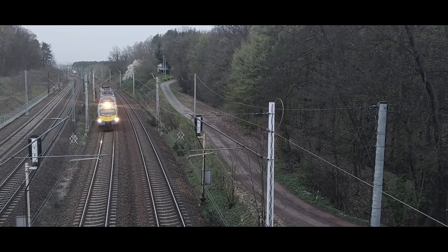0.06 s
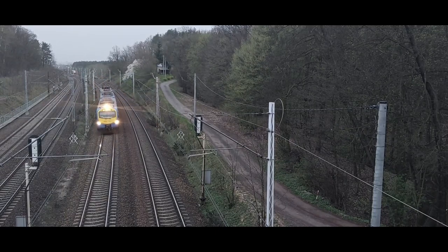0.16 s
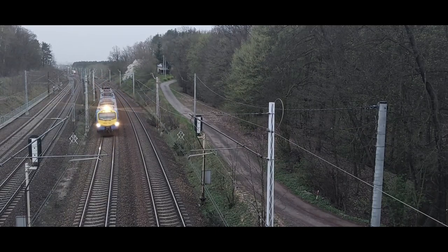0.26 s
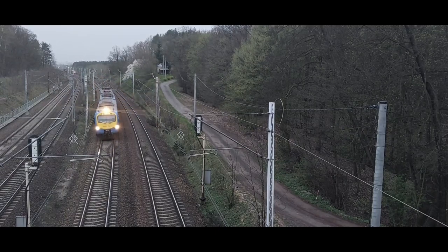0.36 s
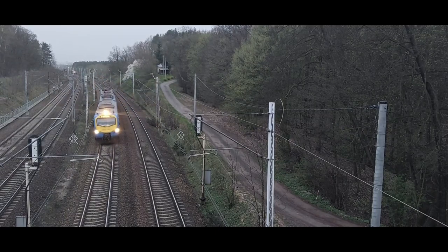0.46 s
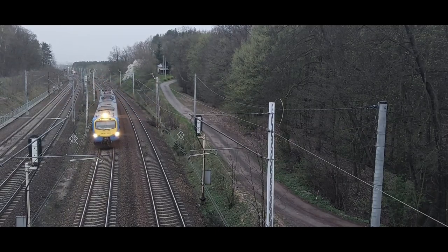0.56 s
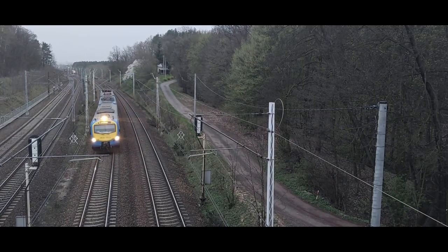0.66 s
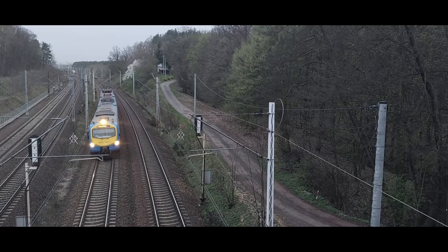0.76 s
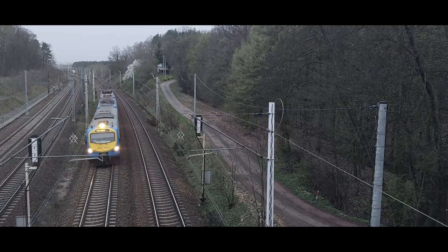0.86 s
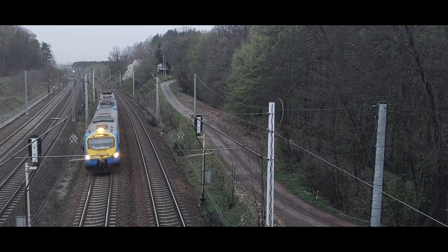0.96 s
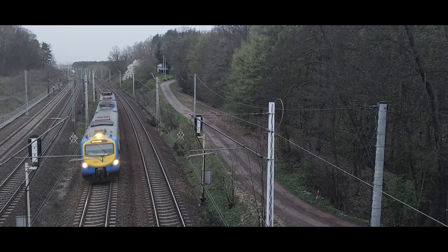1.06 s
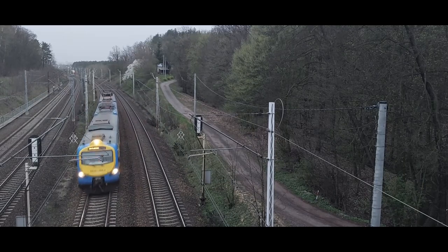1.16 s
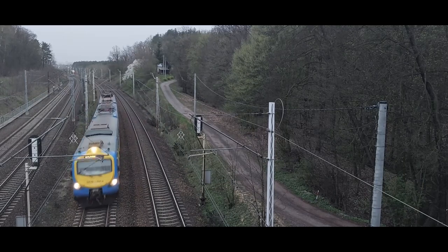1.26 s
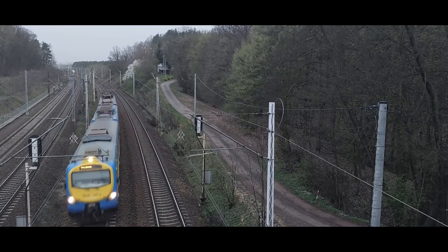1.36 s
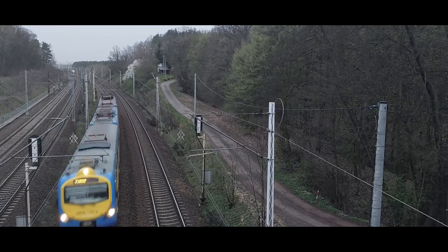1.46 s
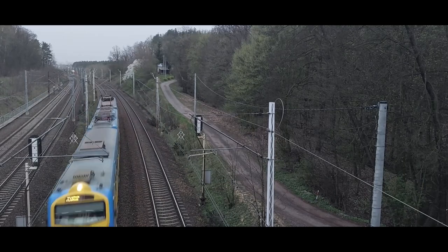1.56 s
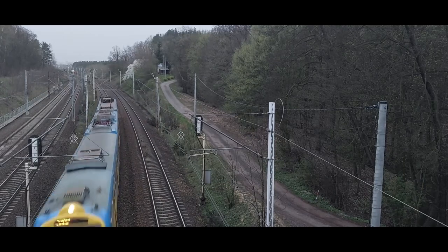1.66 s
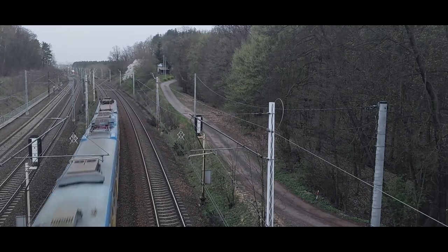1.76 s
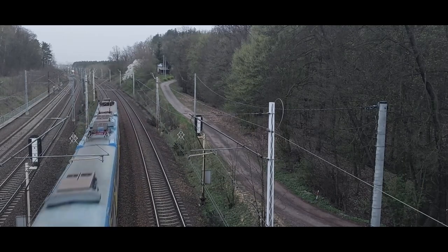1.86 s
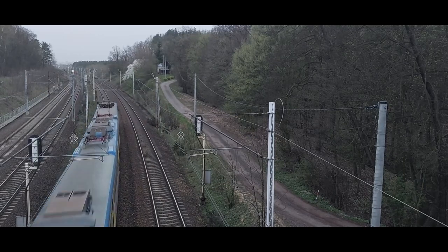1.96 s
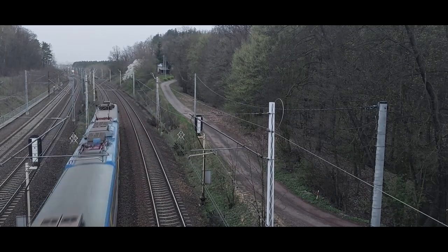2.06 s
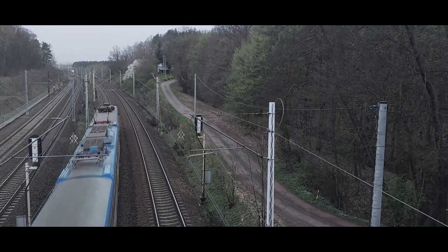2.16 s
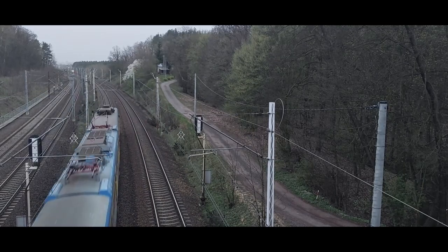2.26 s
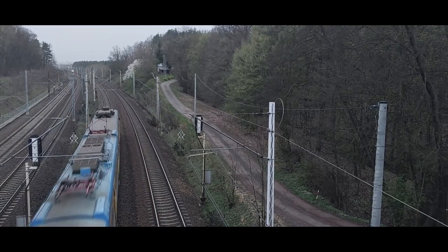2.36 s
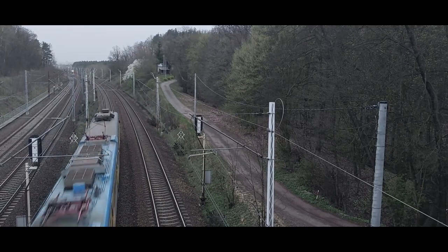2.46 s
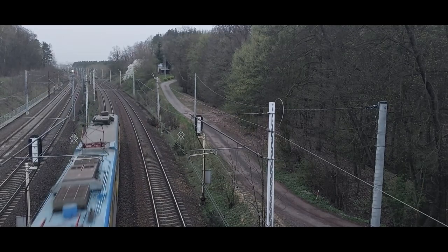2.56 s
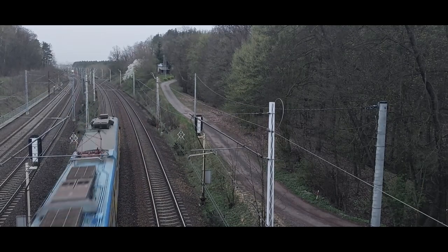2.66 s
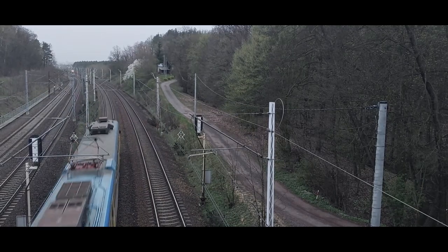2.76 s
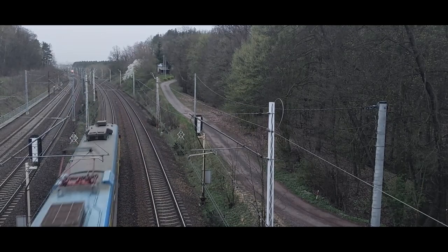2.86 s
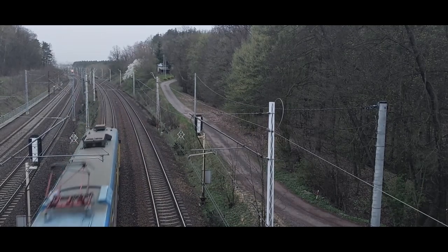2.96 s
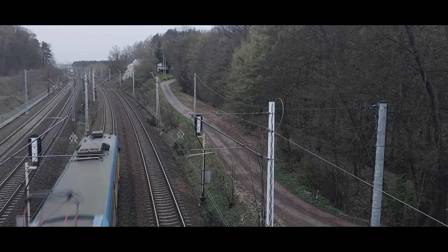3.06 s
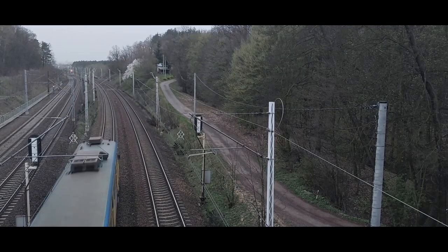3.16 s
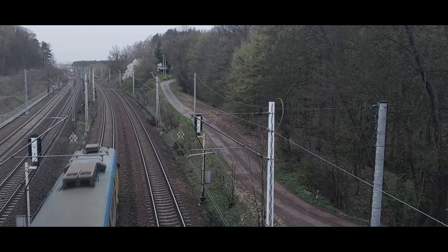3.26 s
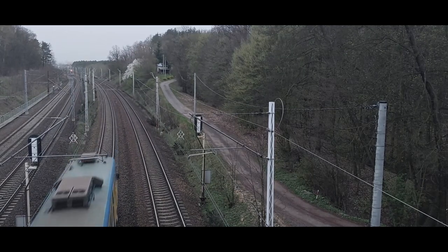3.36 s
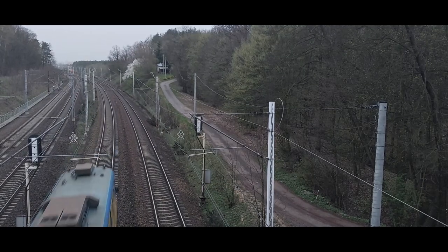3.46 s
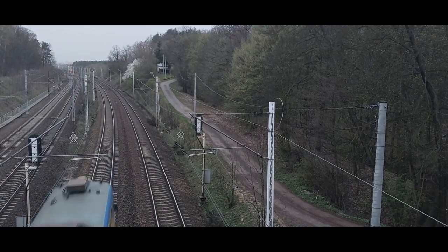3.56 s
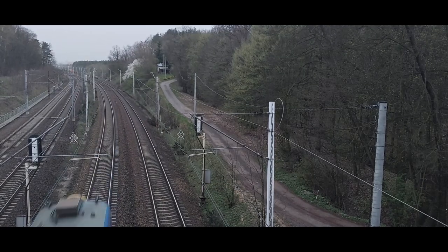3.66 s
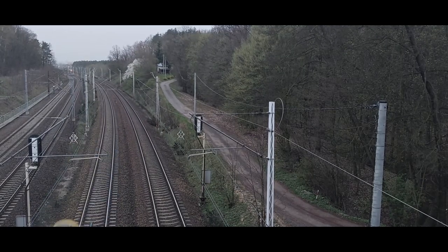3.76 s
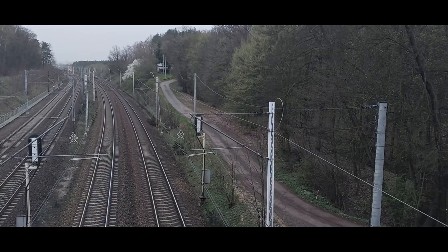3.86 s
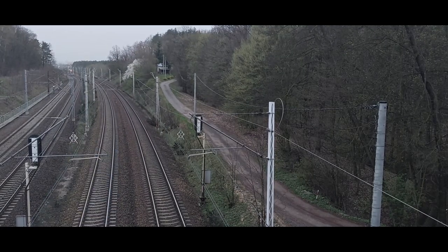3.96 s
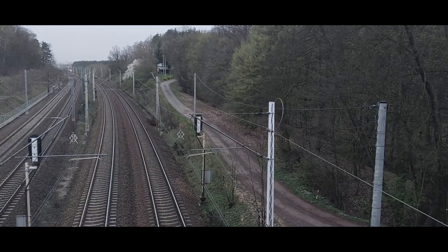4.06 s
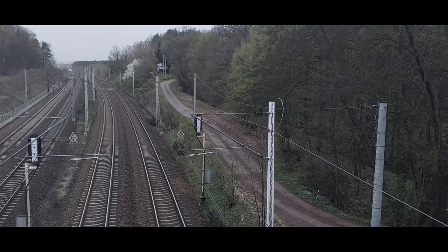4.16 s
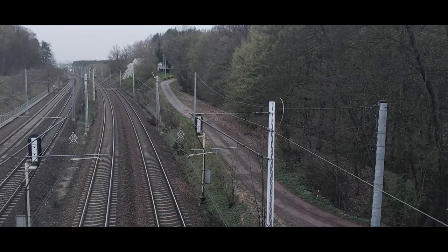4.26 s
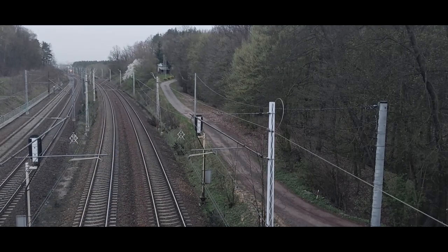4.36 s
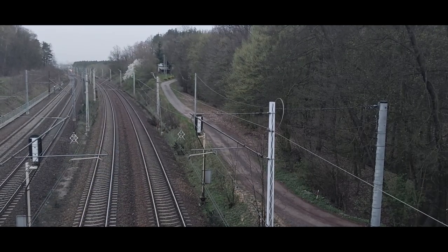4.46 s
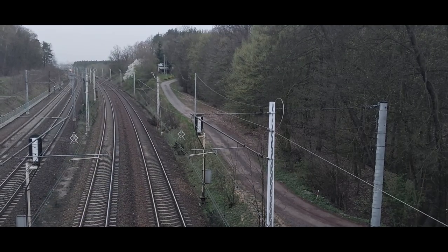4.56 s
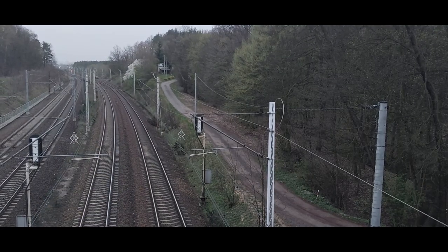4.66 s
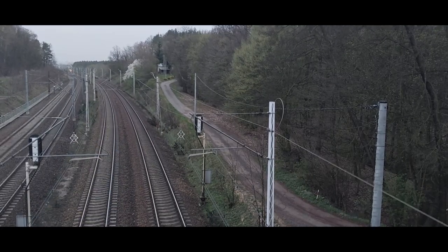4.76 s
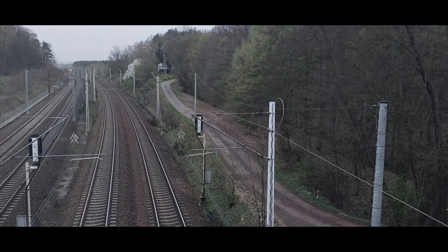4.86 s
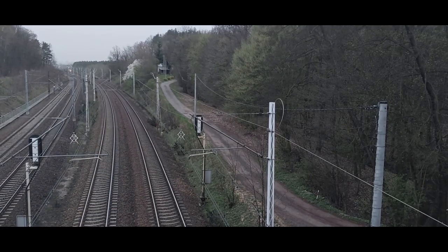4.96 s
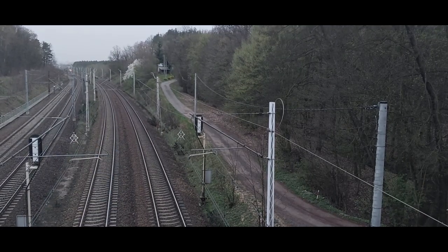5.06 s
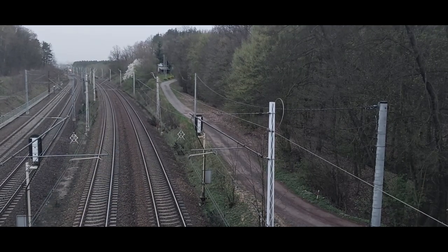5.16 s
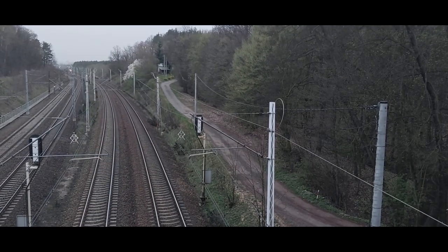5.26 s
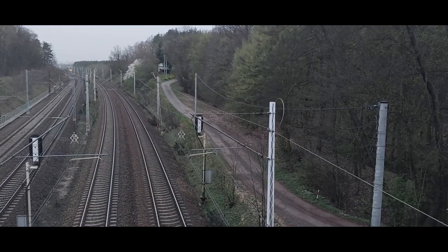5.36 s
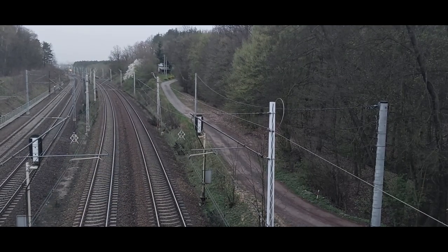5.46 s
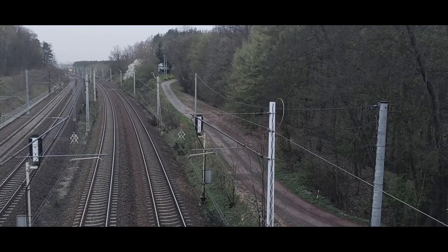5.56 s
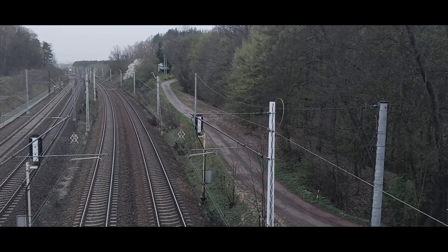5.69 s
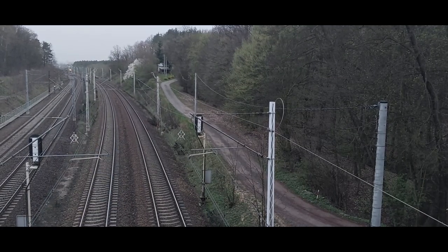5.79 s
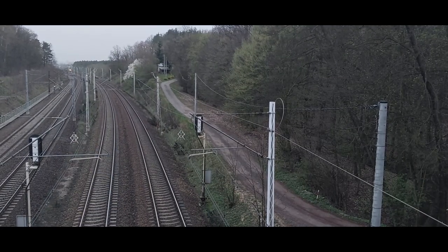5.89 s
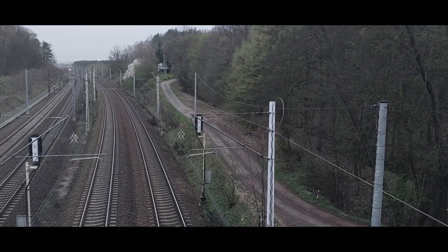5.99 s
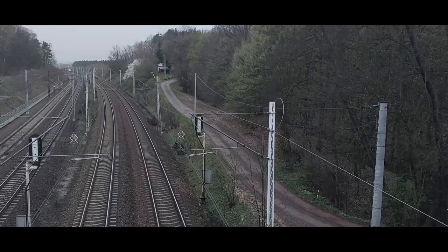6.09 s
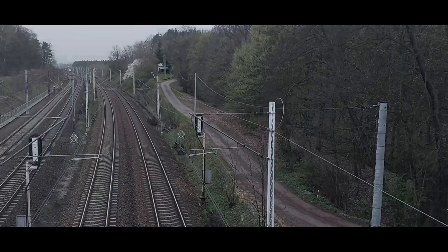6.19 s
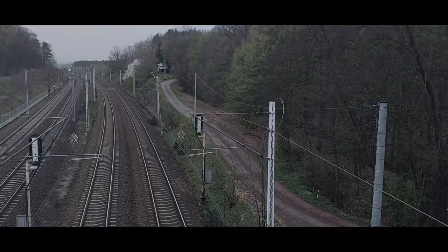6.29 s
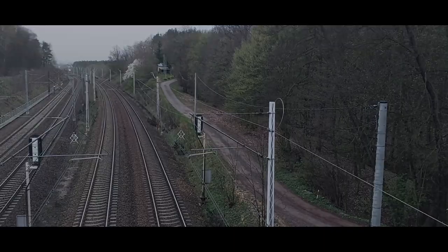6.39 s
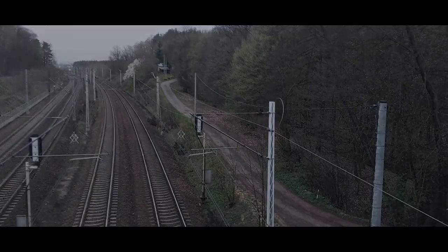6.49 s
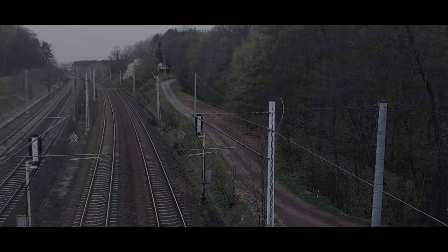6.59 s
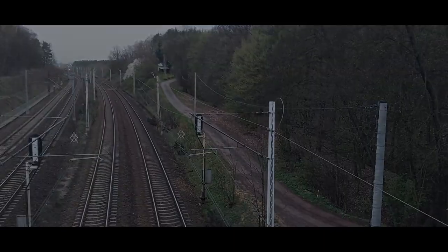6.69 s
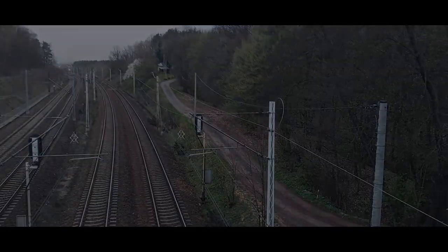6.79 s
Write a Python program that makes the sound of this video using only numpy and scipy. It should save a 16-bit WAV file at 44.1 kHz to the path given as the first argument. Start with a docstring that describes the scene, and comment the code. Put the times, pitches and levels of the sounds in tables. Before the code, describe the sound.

Three blasts of a train's air horn on one pitch, then wheel roar rushing close underneath with a brief hum, fading to ringing rails.

```python
"""An electric train, heard from a bridge over a wooded cutting, comes on with a low roar of wheels and rails.
At once its air horn blows three blasts: reed partials that fade in and out as their paths through the air
interfere, and that the slopes send back as a blurred tail. The roar, noise bands with rail resonances, swells as
the train runs in under the deck, which hums for a moment on one narrow resonance. Then the train draws away:
the roar sinks, the rails sing on as resonant noise, and faint ticks of treble noise follow."""
import sys
import numpy as np
from scipy import signal
from scipy.io import wavfile

SR = 44100
rng = np.random.default_rng(int(sys.argv[2]) if len(sys.argv) > 2 else 0)


def dump_mix(stems):
    """Bounce the given channels to the path in sys.argv[1] as a 16-bit WAV at rate SR."""
    frames = np.atleast_2d(stems).T  # one column per channel
    limited = np.clip(frames, -1, 1)  # hard clip at full scale
    pcm = np.round(limited * 32767).astype(np.int16)
    wavfile.write(sys.argv[1], SR, pcm)


N = 301185


def amp(db):
    """Gain of a level in dB."""
    return 10 ** (np.asarray(db) / 20)


def rms_one(x):
    """Scaled to rms 1."""
    return x / np.sqrt(np.mean(x ** 2) + 1e-20)


def in_time(rows):
    """Columns of a curve table, interpolated at every sample."""
    time_s, *columns = np.transpose(rows)
    return [np.interp(np.arange(N) / SR, time_s, column) for column in columns]


def at_hz(points, hz):
    """A spectrum table read on a log-frequency axis."""
    table_hz, values = np.transpose(points)
    return np.interp(np.log(hz), np.log(table_hz), values)


def drift(rate_hz, size=N):
    """Slow chance, rms 1: noise at every 40th sample through a double one-pole low-pass."""
    r = np.exp(-80 * np.pi * rate_hz / SR)
    noise = rng.standard_normal(size // 40 + 2002)
    slow = signal.lfilter([1], [1, -2 * r, r * r], noise)[2000:]  # settled part
    return np.interp(np.arange(size) / 40, np.arange(len(slow)), rms_one(slow))


def resonance(x, hz, width_hz):
    """Two-pole resonance, gain 1 on top."""
    r = np.exp(-np.pi * width_hz / SR)
    zeros = np.array([1, 0, -1]) * (1 - r * r) / 2
    poles = [1, -2 * r * np.cos(2 * np.pi * hz / SR), r * r]
    return signal.lfilter(zeros, poles, x)


def sides(db):
    """Left and right gains of a left-right difference in dB."""
    return np.array([amp(db / 2), amp(-db / 2)])


# faint high ticks: start_s, level_db (before a 4 dB trim)
TICKS = [(5.6261, -44), (5.9194, -46), (6.7261, -48)]
TICK_CUT_HZ, TICK_T60_S = 12000, .05


def ticks():
    """Each tick is a short puff of treble noise: abrupt start, exponential decay."""
    t = np.arange(N) / SR
    shape = 0
    for start_s, level_db in TICKS:
        decay_db = 60 * np.clip(t - start_s, 0, 1) / TICK_T60_S
        shape = shape + amp(level_db - 4 - decay_db) * (t >= start_s)
    high_pass = signal.butter(4, TICK_CUT_HZ, "high", fs=SR, output="sos")
    return shape * rms_one(signal.sosfilt(high_pass, rng.standard_normal((2, N))))


# singing of the rails behind the train: time_s, level_db (of the part common to both sides)
SINGING = [(2.4, -40), (3.2, -30.5), (3.8, -35), (4.4, -33.5), (5.0, -34), (5.6, -32), (6.2, -34),
           (6.83, -37)]
SINGING_HZ, SINGING_PASS_WIDTH_HZ = 810, 75


def singing_rails():
    """Noise twice through the bending resonance of the rail between sleepers; partly alike on both sides."""
    fade_in = (SINGING[0][0] - .3, -70)
    level_db, = in_time([fade_in] + list(SINGING))
    noise = rng.standard_normal((2, N))
    for _ in range(2):
        noise = resonance(noise, SINGING_HZ, SINGING_PASS_WIDTH_HZ)
    mid, side = noise
    pair = rms_one(mid) + 0.81 * rms_one(side) * [[1], [-1]]
    return amp(level_db + 1.84 * drift(4.9)) * pair


# deck hums: start_s, level_db, hold_s
HUM = [(2.988, -31, .012), (3.06, -25.5, .015), (3.106, -28, 0.025), (3.221, -19, 0.042),
       (3.48, -29, 0.021)]
HUM_HZ, HUM_PASS_WIDTH_HZ = 260, 17
HUM_RISE_DB_PER_S, HUM_FALL_DB_PER_S = 700, 400


def deck_hum():
    """A narrow resonance of the bridge deck, shaken while the bogies run under it: steady tone plus noise."""
    t = np.arange(N) / SR
    swells_db = []
    for start_s, level_db, hold_s in HUM:
        rise_db = HUM_RISE_DB_PER_S * np.clip(start_s - t, 0, 1)
        fall_db = HUM_FALL_DB_PER_S * np.clip(t - start_s - hold_s, 0, 1)
        swells_db.append(level_db - rise_db - fall_db)
    shake = rng.standard_normal(N)
    for _ in range(2):
        shake = resonance(shake, HUM_HZ, HUM_PASS_WIDTH_HZ)
    tone = np.sin(2 * np.pi * HUM_HZ * t)
    return amp(np.max(swells_db, axis=0)) * (1.2 * tone + 0.43 * rms_one(shake))


# swing of the rolling noise, each band's mean removed later: time_s, rumble_db, roar_db, hiss_db
ROLLING = [(0, -53, -46.5, -60), (.4, -49.5, -41.5, -61), (1.2, -48, -41, -58), (1.63, -40, -34.5, -54.5),
           (1.79, -41, -30, -53), (1.94, -40, -37.5, -54.5), (2.26, -44, -37.5, -55.5),
           (2.4, -43, -33, -52.5), (2.64, -33.5, -29.5, -48.5), (2.85, -33, -27, -46),
           (3.15, -30, -22, -42), (3.35, -35, -24.5, -43.5), (3.55, -35, -25, -46), (3.8, -37.5, -27, -44),
           (4.09, -39.5, -27, -47.5), (4.45, -44, -30.5, -51.5), (5.05, -44.5, -32.5, -51.5),
           (6.1, -45.5, -34, -52.5), (6.83, -47.5, -36, -55.5)]
# centres of the layers, deep rumble, rumble, roar, ring, hiss, upper hiss, top: centre_hz
LAYER_HZ = (55, 180, 550, 1300, 3500, 6000, 11000)
# relative band spectrum of the rolling noise as the microphones hear it: freq_hz, level_db
ROAR = [(15, -45), (25, -16), (49, -7.5), (193, -8), (253, -6), (313, -7), (803, 3), (1200, -8.5),
        (1450, -7), (3170, -18.5), (4370, -20.5), (7100, -37), (8570, -75), (11800, -32.5), (15500, -53)]
# rail resonances: freq_hz, width_hz, lift_db
RAIL = [(429, 30, 4), (627, 7, 4.5), (686, 14, -0.5), (1098, 42, 2), (1443, 122, 7), (2106, 340, 3),
        (7110, 420, 9)]
# correlation of the two sides: freq_hz, likeness (-1 to 1)
LIKENESS = [(60, 0.93), (99, 1), (160, 0.91), (270, 0.94), (450, 0.7), (740, 0.45), (1220, -0.34),
            (2010, 0.35), (3330, -0.066), (5500, 0.01), (9080, -0.59), (15000, 0.59)]
# balance of the two sides: freq_hz, left_minus_right_db
TILT = [(60, 1), (150, 1), (380, -1), (950, 1), (2380, 0.0), (5980, -1.5), (15000, 0.5)]
# deep rumble follows the roar, in lumps, and lingers; wheel ring and upper hiss follow the hiss
DEEP_SHARE, DEEP_LUMP_DB, DEEP_RISE_DB_PER_S = 0.82, 2, 0.3
RING_SHARE, EDGE_SHARE = 0.72, 1.21


def rolling(flutter_db):
    """Rough wheels and rails roar: third-octave noise bands, levelled by the nearest layers; then the rails ring."""
    rumble, roar, hiss = in_time(ROLLING)
    deep = DEEP_SHARE * roar + DEEP_RISE_DB_PER_S * np.arange(N) / SR + DEEP_LUMP_DB * drift(3)
    layers_db = deep, rumble, roar, RING_SHARE * hiss, hiss, EDGE_SHARE * hiss, hiss
    edges_hz = 25 * 2 ** np.arange(0, 9.5, 1 / 3)
    white = rng.standard_normal((2, 2, N))  # neighbouring bands get unrelated noise
    out = 0
    for band, (low_hz, high_hz) in enumerate(zip(edges_hz, edges_hz[1:])):
        band_pass = signal.butter(2, [low_hz, high_hz], "band", fs=SR, output="sos")
        mid, side = signal.sosfilt(band_pass, white[band % 2])
        hz = np.sqrt(low_hz * high_hz)

        place = np.interp(np.log(hz), np.log(LAYER_HZ), range(7))
        below = min(int(place), 5)
        swing_db = layers_db[below] + (place - below) * (layers_db[below + 1] - layers_db[below])
        level_db = swing_db - swing_db.mean() + at_hz(ROAR, hz) + flutter_db * drift(12)

        alike = np.clip(at_hz(LIKENESS, hz), -1, 1)
        pair = np.sqrt(1 + alike) * mid + np.sqrt(1 - alike) * side * [[1], [-1]]
        out = out + amp(level_db) * sides(at_hz(TILT, hz))[:, None] * pair
    for hz, width_hz, lift_db in RAIL:
        out = out + (amp(lift_db) - 1) * resonance(out, hz, width_hz)
    return rms_one(out)


ECHO_DB, ECHO_T60_S, ECHO_CUT_HZ, ECHO_RISE_S = -18.5, 1, 4100, 0.043


def slopes(feed):
    """Trees and banks scatter: a dull noise tail that rises and dies away, another one for each microphone."""
    t = np.arange(SR) / SR
    envelope = amp(-60 * t / ECHO_T60_S) * np.clip(t / ECHO_RISE_S, 0, 1)
    low_pass = signal.butter(1, ECHO_CUT_HZ, fs=SR, output="sos")
    tail = signal.sosfilt(low_pass, rng.standard_normal((2, SR)) * envelope)
    tail = tail / np.sqrt(np.sum(tail ** 2, axis=1, keepdims=True))  # unit energy
    return amp(ECHO_DB) * signal.oaconvolve(feed[None], tail, axes=1)[:, :N]


# horn blasts: open_s, shut_s, level_db, full_pressure_pitch_hz
BLASTS = [(-.5, .328, 0, 811), (.495, .686, 2, 809.5), (.8, 1.176, .5, 809.5)]
FILL_S, VENT_S = .068, 0.0495  # time constants: pressure builds, leaks away after shutting
SAG_HZ, VENT_SAG_HZ = 24, 22.26  # pitch lost with the pressure: at the start, while venting
SCOOP_HZ, SCOOP_S = 13, .015  # the reed starts flat for an instant
SPEAK_S, STOP_S, STOP_FADE_S = 0.015, 0.054, 0.034  # reed takes hold; stalls this long after shutting; fades


def air(t):
    """Air fills the horn and leaks out: pressure 0-1, valve 0-1, s since shutting, level dB, pitch Hz."""
    latest = np.searchsorted(np.array(BLASTS)[1:, 0], t, "right")
    open_s, shut_s, level_db, full_hz = np.transpose(BLASTS)[:, latest]
    since_s = np.clip(t - shut_s, 0, None)
    filled = 1 - np.exp(-(np.minimum(t, shut_s) - open_s) / FILL_S)
    left = np.exp(-since_s / VENT_S)
    speak = np.clip((t - open_s) / SPEAK_S, 0, 1)
    stall = np.clip(1 - (since_s - STOP_S) / STOP_FADE_S, 0, 1)
    scoop_hz = SCOOP_HZ * np.exp(-(t - open_s) / SCOOP_S)
    pitch_hz = full_hz - SAG_HZ * (1 - filled) - VENT_SAG_HZ * (1 - left) - scoop_hz
    return filled * left, speak * stall, since_s, level_db, pitch_hz


# horn partials: multiple, level_db (over its group), left_minus_right_db, left_lead_rad
PARTIALS = [(1, -1, 7, 1.07), (2, -2, -4.5, 1.1), (3, 0, -2, 1.7), (4, 0.5, 0.5, 2.35), (5, 3.5, 0, 3.7),
            (6, -1.5, -10.5, 4.64), (7, 1, 6.5, 5.2), (8, -0.5, -4, 6.2), (9, -6, 9.5, 6.3),
            (10, -13.5, -3.5, 7.6), (11, -7, 1, 7.7), (12, -5.5, 8.5, 9.3), (13, -1, 5, 8.4),
            (14, 1, 3, 9.5), (15, 3.5, 6, 12), (16, -1, -1, 11), (17, -1.5, 9, 12), (18, -1, 5, 12.6),
            (19, -10, 3, 13.3)]
# groups of partials 1, 2, 3, 4-5, 6-10, 11-19: start_db, swell_db_per_s (as the train nears),
# weak_db (lost at no pressure), fall_db_per_s (after shutting), turn_db_per_s (left minus right)
VOICES = [(-19, -0.5, 5.5, 110, -7), (-16.5, 6, 9.5, 156, 3), (-27.5, 7.5, 6, 110, -3),
          (-36, 2.5, 17, 250, 0.6), (-33.5, 1.5, 20, 400, -2.3), (-52.5, 7.5, 25, 248, -1.5)]
# air paths cancel for a moment: time_s, multiple, left_dip_db, right_dip_db, width_s (negative dip: a lift)
FADES = [(.06, 1, 4.5, 4, 0.034), (.05, 2, 0, 4, 0.092), (.32, 2, 14, 4, 0.025), (.52, 1, 9, 3, 0.052),
         (.56, 2, 14, 2, 0.018), (.6, 2, 8, 4.5, 0.024), (.65, 3, 2, 0, 0.041), (.71, 1, 10, 5, .025),
         (.88, 3, -1, -3, 0.0097), (.91, 1, 7, 8, 0.014), (.95, 2, 3, 1.5, 0.011), (.97, 3, 5, 4, 0.017),
         (1.03, 2, 1, 8, 0.021), (1.04, 3, 7, 7, 0.025), (1.07, 1, 8, 10, 0.042), (1.11, 1, 13, 10, 0.013),
         (1.105, 3, 9, 7, 0.017), (1.13, 2, 4, 17, .013), (1.17, 3, 8, 10, 0.031), (.27, 3, 7, 4.5, 0.07),
         (.26, 2, 3, 4.5, .03), (.27, 5, 6, 9, 0.044), (1.17, 5, 4, 7, 0.04)]
SHIMMER_DB, SHIMMER_HZ = 2.5, 24.8  # turbulent air flutters each partial at each microphone
SHIMMER_LOW_SHARE = .4  # long waves flutter less: partials 1 and 2
BELL_SMEAR_RAD = .35  # per partial squared: the bell spreads each puff in time
# slopes behind the train return the horn lower on average, by a wandering pitch ratio
BEHIND_PITCH_RATIO, BEHIND_SPREAD_RATIO = .975, .016
BEHIND_DB, BEHIND_DB_PER_PARTIAL = 0.5, 0.5  # level of that part; gain per partial
ECHO_SWELL_SHARE = -0.13  # the feed of the slopes sinks or swells against the direct swell


def horn():
    """The reed lets out one puff a cycle: partials that brighten and rise with pressure; direct sound, echo feed."""
    size = round(1.4 * SR)
    t = np.arange(size) / SR
    pressure, valve, since_s, blast_db, pitch_hz = air(t)
    behind_ratio = BEHIND_PITCH_RATIO + BEHIND_SPREAD_RATIO * drift(13.45, size=size)
    phase = 2 * np.pi * np.cumsum(pitch_hz) / SR
    behind_phase = 2 * np.pi * np.cumsum(pitch_hz * behind_ratio) / SR
    direct, feed = np.zeros((2, N)), np.zeros(N)
    for multiple, partial_db, pan_db, lead_rad in PARTIALS:
        k = round(multiple)
        group = np.searchsorted([2, 3, 4, 6, 11], k, "right")
        start_db, swell_db, weak_db, fall_db, turn_db = VOICES[group]
        level_db = partial_db + blast_db + start_db + swell_db * t
        level_db = level_db - weak_db * (1 - pressure) - fall_db * since_s
        height = np.sqrt(2) * valve * amp(level_db)

        dips_db = np.zeros((2, size))
        for time_s, faded, left_db, right_db, width_s in FADES:
            if round(faded) == k:
                dips_db += np.outer([left_db, right_db], np.exp(-((t - time_s) / width_s) ** 2))
        pan = sides(pan_db + turn_db * t) * amp(-dips_db)

        shimmer_db = SHIMMER_DB * (SHIMMER_LOW_SHARE if k < 3 else 1)
        lead_makeup = 1 / max(abs(np.cos(lead_rad / 2)), .5)  # offsets loss in the left-right sum
        for side, sign in enumerate((1, -1)):
            flutter = amp(shimmer_db * drift(SHIMMER_HZ, size=size))
            wave = np.cos(k * phase - BELL_SMEAR_RAD * k * k + sign * lead_rad / 2)
            direct[side, :size] += height * pan[side] * flutter * lead_makeup * wave

        behind = amp(BEHIND_DB + BEHIND_DB_PER_PARTIAL * k) * np.cos(k * behind_phase)
        feed_gain = amp((ECHO_SWELL_SHARE - 1) * swell_db * t)
        feed[:size] += height * feed_gain * (np.cos(k * phase) + behind)
    return direct, feed


def scene():
    """Ticks, rails, deck, rolling noise, echoes and horn."""
    train = ticks() + singing_rails() + deck_hum() + amp(-24.5) * rolling(flutter_db=1.06)
    direct, feed = horn()
    return train + slopes(feed) + direct


BASS_CUT_HZ, TOP_CUT_HZ, PEAK_LIMIT = 29, 15700, .98


def record(dry):
    """The deepest bass is lost, the highest peaks are rounded, the top is cut."""
    high_pass = signal.butter(3, BASS_CUT_HZ, "high", fs=SR, output="sos")
    thin = signal.sosfilt(high_pass, dry)
    rounded = thin / (1 + np.abs(thin / PEAK_LIMIT) ** 16) ** (1 / 16)
    low_pass = signal.ellip(12, .3, 50, TOP_CUT_HZ, fs=SR, output="sos")
    return signal.sosfilt(low_pass, rounded)


dry = scene()
out = record(dry)
dump_mix(out)
```